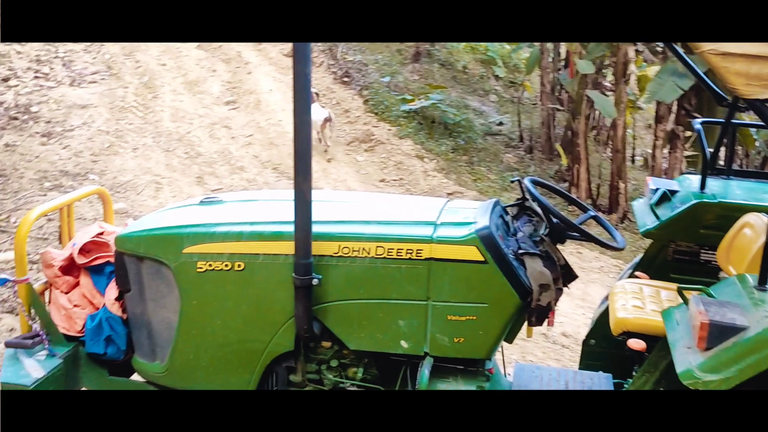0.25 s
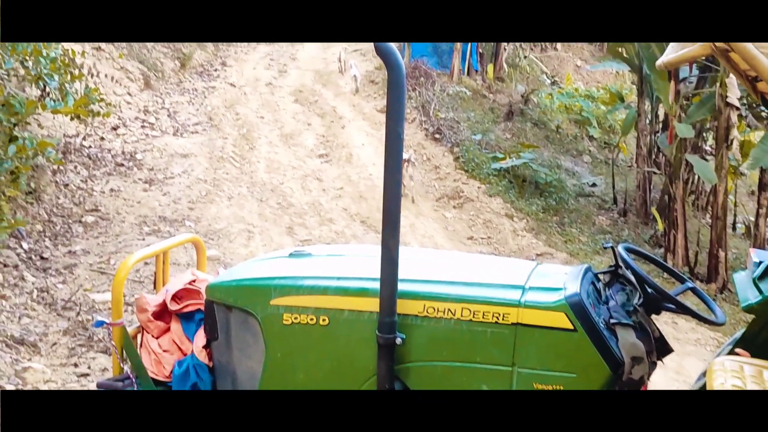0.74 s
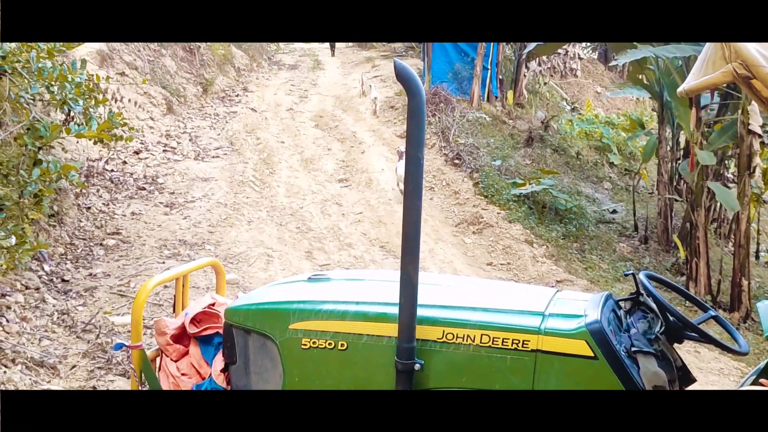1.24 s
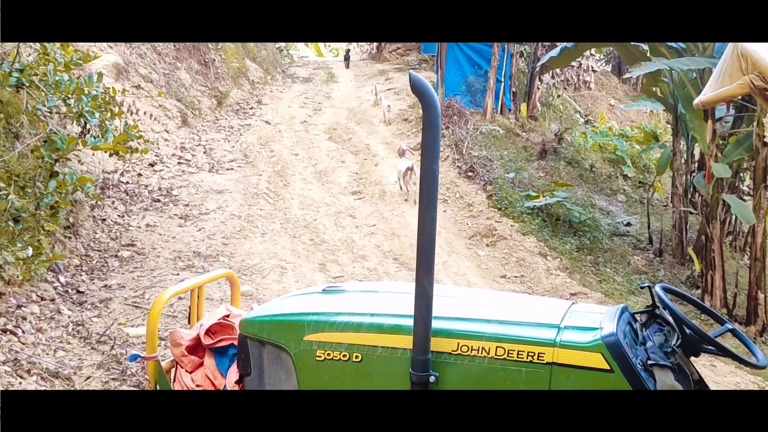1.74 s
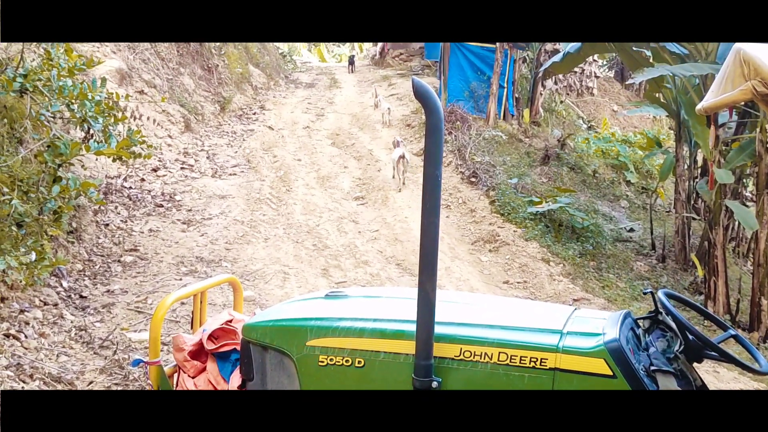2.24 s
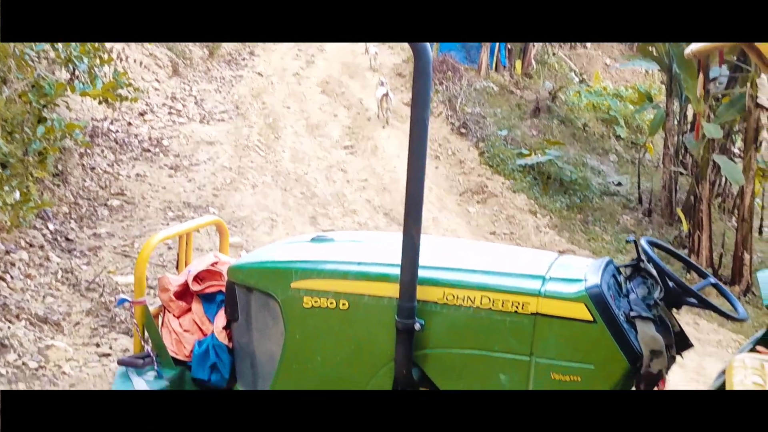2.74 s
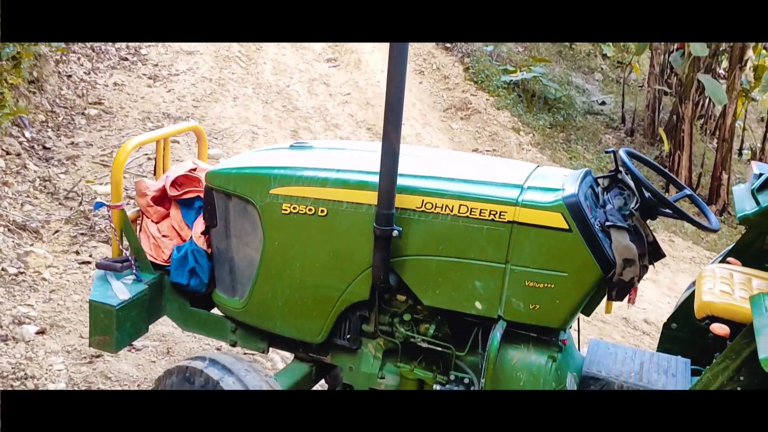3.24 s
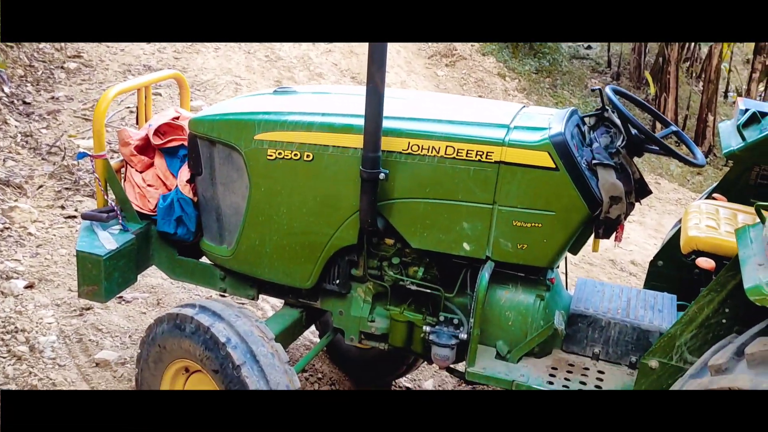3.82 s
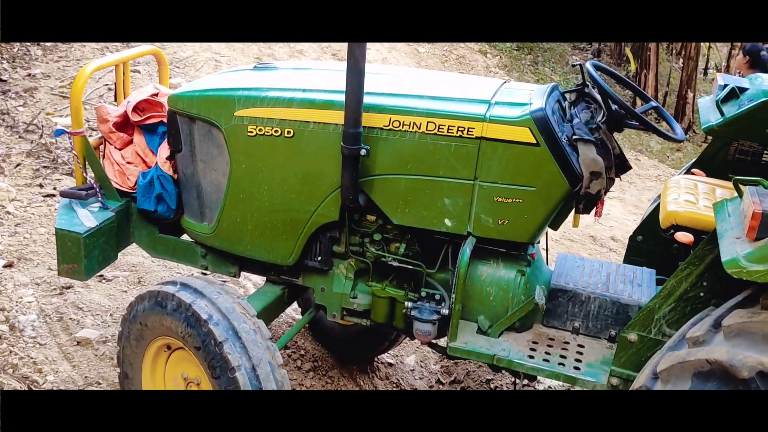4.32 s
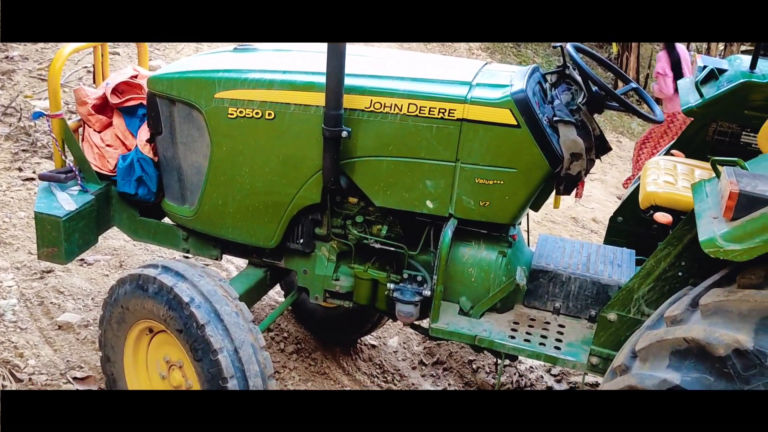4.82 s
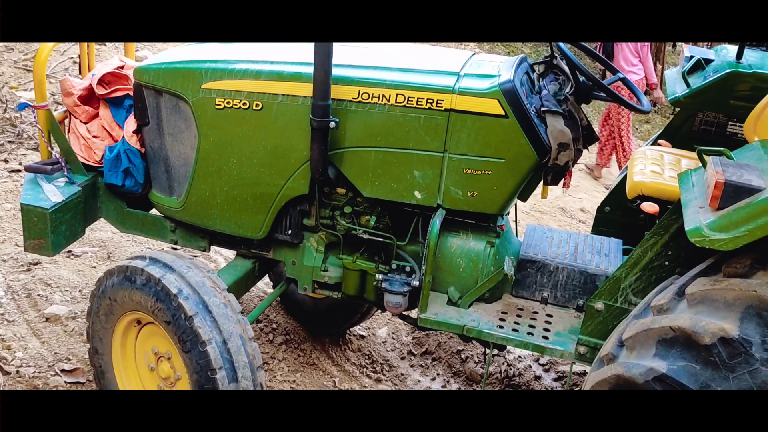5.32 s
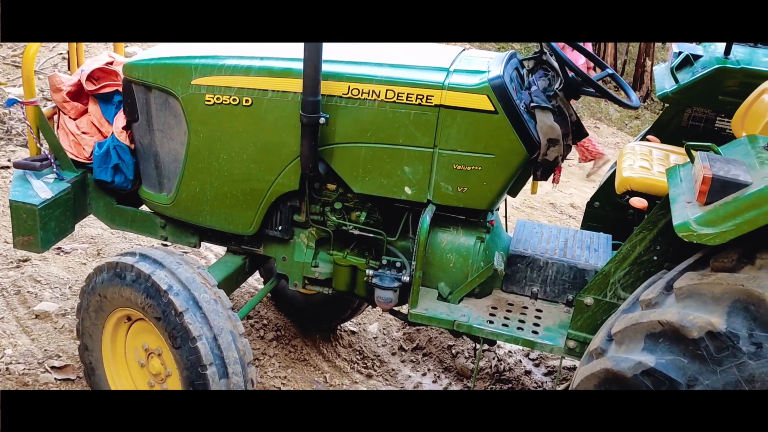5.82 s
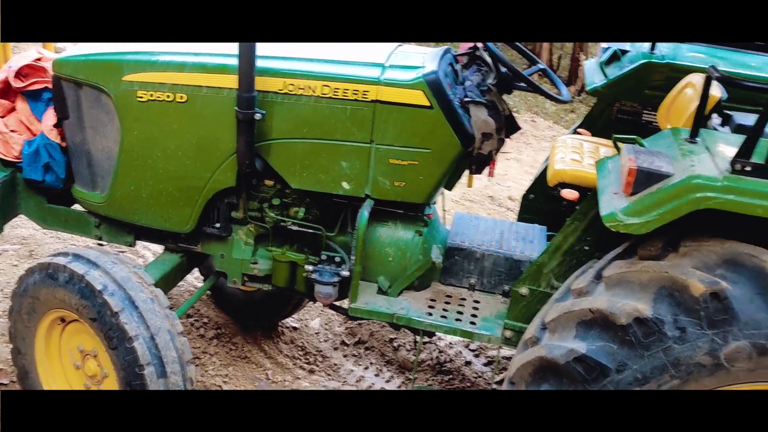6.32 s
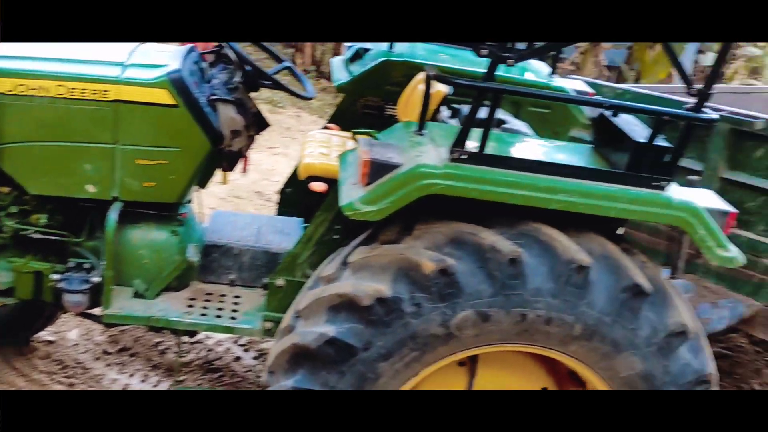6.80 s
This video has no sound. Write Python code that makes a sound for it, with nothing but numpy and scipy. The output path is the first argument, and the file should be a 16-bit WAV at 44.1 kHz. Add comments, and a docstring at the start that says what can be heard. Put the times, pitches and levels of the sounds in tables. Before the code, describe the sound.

On an open dirt track, steel blades jab into gravel with short crunches and bright pebble clicks. Around one second clods knock and boom on a loose metal sheet, which throbs and chatters. Two strong gritty shovel strokes follow, then quieter scrapes, dull thumps and soft close bumps on the left. Clicks return late, ending with two metallic digs. Stereo microphone, digging off to the right, low murmur beneath.

```python
"""Steel blades bite and scrape through loose gravel, pebbles click, and clods boom on a steel sheet.
Earth thumps down, bumps sound close to the left port, soil trickles over a low outdoor murmur.
Shaped impact noise makes gravel, soil, sand and grit; decaying sine modes make steel, stones and knocks.
Filtered noise makes the murmur and a thin echo; two coloured microphone ports pick it all up."""
import sys
import numpy as np
from scipy import signal
from scipy.fft import rfft, irfft
from scipy.io import wavfile
from scipy.ndimage import map_coordinates

SR = 44100
rng = np.random.default_rng(int(sys.argv[2]) if len(sys.argv) > 2 else 0)


def materialize(psi):
    """Save the field psi as 16-bit PCM at rate SR to the path in sys.argv[1].

    A 1-D psi becomes a single channel; in a 2-D psi each row is a channel.
    """
    bounded = np.clip(np.atleast_2d(psi).T, -1, 1)
    quanta = np.round(bounded * 32767).astype(np.int16)
    wavfile.write(sys.argv[1], SR, quanta)


N = 311346
T = np.arange(N) / SR
AGE = T[:SR]  # time since event onset, s

# blade strokes: t/s, push length/s, gravel level/dB, soil level/dB, sand level/dB, blade level/dB
BLADE_STROKES = [(0.003, 0.023, -47, -54, -71, -54), (0.165, 0.008, -51, -72, -42, -61),
                 (0.536, 0.041, -45, -46.5, -42, -60), (1.006, 0.041, -52, -47, -58, -61),
                 (1.043, 0.054, -49.5, -43, -60, -54), (1.09, 0.026, -47, -33.5, -65, -46),
                 (1.59, 0.033, -32.5, -33.5, -29.5, -45.5), (1.716, 0.011, -61, -48, -47, -78),
                 (2.177, 0.022, -46.5, -54, -49.5, -52), (2.247, .072, -33, -35.5, -26, -54),
                 (2.35, 0.0068, -54, -45.5, -44, -62), (2.682, 0.069, -47.5, -49, -45.5, -54),
                 (2.792, 0.028, -55, -66, -47, -64), (3.267, 0.069, -57.5, -59.5, -59, -63),
                 (3.381, 0.018, -57, -52.5, -55.5, -74), (3.674, 0.088, -76, -58, -67, -69),
                 (3.85, 0.065, -62, -56, -59, -70), (4.107, 0.0044, -57, -63, -80, -61),
                 (4.219, 0.073, -80, -62.5, -83, -81), (4.623, 0.015, -53, -72, -73, -64),
                 (5.06, 0.011, -53, -56, -66, -71), (5.455, 0.0054, -49, -52, -71, -67),
                 (5.593, 0.1, -54, -62, -51, -75), (6.851, 0.018, -39, -42.5, -29.5, -44.5),
                 (6.972, 0.03, -41, -54, -42, -51)]
# bare blade strikes a stone: t/s, level/dB
BLADE_CLANGS = [(1.603, -47.5), (2.283, -50), (6.859, -42.5), (6.986, -45.5)]
# gravel spectrum: f/Hz, density/dB per Hz
GRAVEL_SPECTRUM = [(200, -29), (900, -5), (1500, -5.5), (2200, -0.5), (3000, -2), (4200, 0), (6500, -1),
                   (8500, -3), (11000, -3.5), (15500, -12.5)]
# soil rustle spectrum: f/SOIL_HZ, density/dB per Hz
SOIL_SPECTRUM = [(.15, -12), (.4, -18.5), (.65, -1.5), (1, 2), (1.6, -1.5), (2.5, -3.5), (4, -8.5),
                 (7, -16), (13, -10.5), (45, -68)]
# sand hiss spectrum: f/Hz, density/dB per Hz
SAND_SPECTRUM = [(1000, -32), (4000, -0.5), (8000, 3.5), (10500, 3.5), (12500, -3), (14000, 3),
                 (15500, -15)]
SOIL_HZ = 291
RISE_SHARE, SETTLE_T60_S = 0.45, 0.21  # part of a push spent building up; decay after it
JERK_DB, JERK_HZ = 1.8, 110  # unevenness of the advance
COARSE_SHARE = 0.5  # coarse stones' share of gravel energy


def strokes():
    """The blade shoves stones in jerks: gravel crunches, stones chink, soil rustles, sand hisses, steel rings."""
    out, shove = np.zeros((2, N)), np.zeros((1, N))
    soil_points = [(k * SOIL_HZ, db) for k, db in SOIL_SPECTRUM]
    for t_s, length_s, gravel_db, soil_db, sand_db, blade_db in BLADE_STROKES:
        rise = np.minimum(AGE / (RISE_SHARE * length_s), 1)
        push = rise * fade(SETTLE_T60_S, length_s) * amp(JERK_DB * walk(JERK_HZ, SR))
        crunch = grains(rate_hz=5500, spread_db=3.0, apart=0.54)
        soil = unit(colour(grains(rate_hz=3000, spread_db=2.5, apart=1.0), soil_points))
        sand = unit(colour(grains(rate_hz=12000, spread_db=4.0, apart=2.6), SAND_SPECTRUM))
        fine = np.sqrt(1 - COARSE_SHARE) * unit(colour(crunch, GRAVEL_SPECTRUM))
        add(out, t_s, push * (amp(gravel_db) * fine + amp(soil_db) * soil + amp(sand_db) * sand))
        add(shove, t_s, push * amp(gravel_db))
        blade = steel()
        add(out, t_s, amp(blade_db) * convolve(push * crunch, blade / np.linalg.norm(blade)))
    for t_s, db in BLADE_CLANGS:
        add(out, t_s, amp(db) * steel())
    coarse = pebbles(count=3600, spread_db=2.5, cycles=23)
    return out + np.sqrt(COARSE_SHARE) * shove * coarse


# shovel blade modes: f/Hz, level/dB, t60/s
BLADE_MODES = [(606, 0, .15), (733, -1, 0.17), (872, 2, .35), (1174, 5, 0.38), (1631, -1.5, .45),
               (1701, -3, .3), (2116, -9, 0.35), (2258, -9, 0.25), (2320, -4, .3), (2506, 0, 0.42),
               (2790, 2, 0.22), (2950, 4, .13), (3946, -2, .22), (4107, -2, 0.22), (4656, 0, .22),
               (7635, 5, 0.16), (8129, 4, .2), (8320, 7, .19)]
BLADE_HZ = 2480  # modes lose 7 dB per octave away from here


def steel():
    """Free ring of a blade; stones excite its middle modes most."""
    modes = [(hz, db - 7 * abs(np.log2(hz / BLADE_HZ)), t60_s) for hz, db, t60_s in BLADE_MODES]
    return ring(modes, detune=0.00017)


def pebbles(count, spread_db, cycles):
    """Coarse gravel: each stone pings a few cycles at its own pitch and strength, unequal at the ports."""
    when, pitch, size, side = rng.random((4, count, 1))
    k, hz = np.arange(256), 1900 * 5 ** pitch
    turns = hz * k / SR
    strength = amp(-spread_db * np.log(np.maximum(size, 0.03))) * hz ** 0.4
    pings = strength * np.sin(2 * np.pi * turns) * amp(-60 * turns / cycles)
    places = ((when * N).astype(int) + k).ravel()
    ports = [np.bincount(places, (pings * (0.5 + near)).ravel(), N)[:N] for near in (side, 1 - side)]
    return unit(np.array(ports))


# stone clicks: t/s, level/dB, rattle/dB re click, tone centre f/Hz
STONE_CLICKS = [(0.169, -28, -6, 4760), (0.172, -32.5, -16, 2580), (0.323, -34.5, -28, 6300),
                (0.3754, -22, -17.5, 6300), (0.4226, -36, -15, 7550), (0.53, -44, -2, 4500),
                (0.5386, -31, -12, 4530), (0.5452, -27.5, -19, 2280), (0.582, -38.5, -20, 2270),
                (0.616, -38.5, -6, 6960), (0.6225, -32.5, -15, 4900), (0.6759, -28, -38, 5500),
                (1.0487, -33.5, -7.5, 2130), (1.055, -35, -7, 2120), (1.074, -33, -24, 2120),
                (1.103, -35.5, 2.5, 3460), (1.226, -38.5, -5.5, 4150), (1.5976, -25.5, -5, 4000),
                (2.185, -45, -4, 4940), (2.259, -32, -3, 3900), (2.278, -32.5, -7.5, 1090),
                (2.2799, -25, -10, 4530), (2.301, -30.5, -3, 3980), (2.326, -28, -7, 6200),
                (2.372, -38, -12, 3740), (4.6266, -45.5, 2.5, 4650), (5.415, -53, -1.5, 6960),
                (5.461, -35, -11, 4300), (5.561, -38, -12, 4200), (5.595, -35, -11, 2230),
                (5.6, -34.5, -15, 2150), (5.6066, -37, -17, 2230), (5.646, -40, -27, 2600),
                (5.6933, -35, -20, 5900), (5.6965, -36, -27, 5100), (5.741, -41, -16, 2400),
                (5.7243, -37, -14, 4670), (5.774, -36.5, -7, 6400), (5.8765, -43.5, -31, 3530),
                (5.955, -43.5, -13, 10500), (6.04, -51, 4.5, 8000), (6.149, -44.5, -13, 8700),
                (6.421, -45, -15, 1710), (6.859, -33, 1, 3030), (6.997, -36, -7, 3060),
                (7.005, -34, -19, 3060)]
# pebble modes: f/click centre, level/dB, t60/s
PEBBLE_MODES = [(.56, -10, 0.016), (1, -12.5, 0.044), (1.17, -17, 0.032)]
CLICK_T60_S, RATTLE_T60_S = 0.012, 0.22
SNAP_DB = 13  # single-sample first contact


def stones():
    """A pebble cracks against another, rings briefly, then rattles its neighbours."""
    out = np.zeros((2, N))
    for t_s, db, rattle_db, hz in STONE_CLICKS + strays():
        tone = [(hz / 12, -28), (hz / 1.84, -7), (hz, 0), (hz * 1.72, -5), (hz * 3, -17), (hz * 6, -32)]
        crackle = grains(rate_hz=11000, spread_db=-8.5, apart=1.0)
        decay = amp(-4.5) * fade(CLICK_T60_S) + amp(rattle_db) * fade(RATTLE_T60_S)
        contact = amp(SNAP_DB) * (AGE == 0) + crackle * decay
        add(out, t_s, amp(db) * colour(contact, tone) / np.std(colour(crackle, tone)))
        modes = [(k * hz, level_db, t60_s) for k, level_db, t60_s in PEBBLE_MODES]
        add(out, t_s, amp(db) * ring(modes, detune=0.013))
    return out


STRAY_RATE_HZ, STRAY_DB_RE_FLOW, STRAY_RATTLE_DB, STRAY_HZ = 2, 10, -12, 5000


def strays():
    """Faint pebbles roll at random moments, louder while more soil runs; rows as in STONE_CLICKS."""
    chance = rng.random((int(STRAY_RATE_HZ * N / SR), 2))
    return [(t_s, flow_db(t_s) + STRAY_DB_RE_FLOW, STRAY_RATTLE_DB, STRAY_HZ * 2 ** (octave - 0.5))
            for t_s, octave in chance * [N / SR, 1]]


# clods on the sheet: t/s, thud level/dB, grit level/dB, boom level/dB, knock level/dB, knock f/Hz
CLOD_HITS = [(0.921, -41, -46, -58, -44, 576), (1.047, -31, -31, -44, -28, 459),
             (1.063, -34, -46, -50, -29, 495), (1.099, -37, -35.5, -43, -34, 290),
             (1.121, -40, -41, -50, -30.5, 300), (1.172, -44, -65, -57, -31.5, 288),
             (1.194, -55, -55, -65, -41, 272), (1.225, -38, -40, -38, -29, 246.5),
             (1.252, -56, -61, -48, -31.5, 281), (1.3168, -26, -33.5, -19.5, -27.5, 260),
             (1.429, -29.5, -41, -28.5, -36, 169), (1.442, -34.5, -52, -35, -39, 420),
             (1.495, -38.5, -46.5, -49, -62, 407), (6.217, -55, -65, -76, -52, 660)]
# steel sheet modes: f/Hz, level/dB, t60/s
SHEET_MODES = [(140, -24, 0.36), (247, -17.5, 0.49), (300.3, -10.5, 0.38), (318.4, -9.5, 0.29),
               (389.3, 4.5, 0.26), (435, -15, 0.37), (498, -9.5, 0.35), (620, -30, 0.22), (722, -27, 1),
               (740, -18, 0.33), (776, -21, 0.5), (960, -17, 0.32), (970, -32, 0.82)]
# thud spectrum: f/Hz, density/dB per Hz
THUD_SPECTRUM = [(50, -49), (120, -7.5), (220, -6.5), (330, -4), (490, -0.5), (760, -2), (1200, -16.5),
                 (2500, -32), (8000, -68)]
# grit spectrum: f/Hz, density/dB per Hz
GRIT_SPECTRUM = [(300, -8.5), (1000, 6.5), (1500, 0.5), (2200, 7), (3200, -4), (6000, -9.5), (10000, -62),
                 (15000, -39)]
CLOD_T60_S = 0.23
ROCK_HZ, ROCK_DEPTH, ROCK_PEAK_S = 27, 0.55, 0.013  # loose sheet rocks: rate, depth 0-1, first swell


def clods():
    """A clod knocks and bursts into thud and grit; the sheet swells into a boom that throbs as it rocks."""
    out = np.zeros((2, N))
    rocking = 1 + ROCK_DEPTH * np.cos(2 * np.pi * ROCK_HZ * (AGE - ROCK_PEAK_S))
    throb = rocking * (1 - np.exp(-(AGE / 0.004) ** 2))
    burst = np.minimum(AGE / 0.0017, 1) * fade(CLOD_T60_S, 0.0021)
    for t_s, thud_db, grit_db, boom_db, knock_db, knock_hz in CLOD_HITS:
        thud = unit(colour(grains(rate_hz=4000, spread_db=0.5, apart=0.34), THUD_SPECTRUM))
        grit = unit(colour(grains(rate_hz=1100, spread_db=2.0, apart=0.99), GRIT_SPECTRUM))
        boom = throb * ring(SHEET_MODES, detune=0.0023)
        add(out, t_s, amp(boom_db) * boom + amp(knock_db) * knock(knock_hz, t60_s=0.14))
        add(out, t_s, burst * (amp(thud_db) * thud + amp(grit_db) * grit))
    return out


# dull knock modes: f/knock pitch, level/dB, share of knock t60
KNOCK_MODES = [(.68, 6, 0.14), (1, 0, 0.87), (1.22, 5.5, 0.35), (1.501, -9, 0.5)]


def knock(hz, t60_s):
    """Soft contact: builds over one cycle; each mode dies in its share of t60_s."""
    modes = [(k * hz, db, share * t60_s) for k, db, share in KNOCK_MODES]
    return ring(modes, detune=0.0031) * np.minimum(AGE * hz, 1)


# sheet bounces: t/s, level/dB, f/free ring f
SHEET_REBOUNDS = [(1.475, -27.5, 0.99), (1.498, -32, 0.98), (1.512, -28, 1.04), (1.53, -35, 1.04),
                  (1.548, -40, 1.02), (1.567, -36, 1.07)]
REBOUND_RISE_S = 0.0058


def rebounds():
    """The loose sheet chatters on its support: short swells of its ring, bent a little in pitch."""
    out = np.zeros((2, N))
    for t_s, db, bend in SHEET_REBOUNDS:
        modes = [(bend * hz, level_db, t60_s) for hz, level_db, t60_s in SHEET_MODES]
        add(out, t_s, amp(db) * swell(REBOUND_RISE_S) * ring(modes, detune=0.002))
    return out


# loads of earth on the heap: t/s, time to peak/s, level/dB, f/Hz
EARTH_THUMPS = [(2.272, 0.0098, -42, 747), (2.312, 0.0081, -27.5, 292), (2.338, 0.0086, -38, 237),
                (2.356, 0.0083, -39, 314), (3.58, 0.017, -47, 150), (3.692, 0.018, -47.5, 310),
                (3.792, 0.015, -51, 307), (4.14, .016, -52.5, 157), (4.241, 0.022, -49, 94.5),
                (4.29, 0.015, -50, 257), (4.322, 0.021, -51.5, 321), (4.613, 0.026, -48, 105),
                (5.603, 0.0098, -48, 125), (5.634, 0.011, -42.5, 175), (6.216, 0.0043, -46, 633),
                (6.394, 0.0058, -49.5, 361), (6.858, 0.019, -42.5, 615), (6.864, 0.01, -46.5, 175),
                (6.996, 0.0088, -45, 127)]
# thump modes: f/thump pitch, level/dB, t60/s
EARTH_MODES = [(.78, -3, 0.31), (1, 3.5, 0.3), (1.24, -2, .15)]


def thumps():
    """Soft earth lands with a dull note that swells and is damped at once."""
    out = np.zeros((2, N))
    for t_s, rise_s, db, hz in EARTH_THUMPS:
        modes = [(k * hz, level_db, t60_s) for k, level_db, t60_s in EARTH_MODES]
        add(out, t_s, amp(db) * swell(rise_s) * ring(modes, detune=0.0023))
    return out


# soft bumps close by: t/s, level/dB, f/Hz, contact tick level/dB
NEAR_BUMPS = [(3.238, -38, 253, -51), (3.467, -34.5, 234, -46.5), (4.86, -42, 388, -55),
              (4.871, -40.5, 357, -44), (6.568, -38, 200, -40.5), (6.709, -40.5, 124, -52),
              (7.001, -30.5, 324, -39)]
BUMP_CYCLES, BUMP_PAN_DB = 5.4, 22.5  # knock t60 in cycles; left minus right


def bumps():
    """Dull knocks with a contact tick, so near that the left port hears them much louder."""
    out = np.zeros((2, N))
    tick_modes = [(825, 0.5, 0.0024), (1420, -5.0, 0.0045), (2040, -28, 0.0023)]  # f/Hz, level/dB, t60/s
    for t_s, db, hz, tick_db in NEAR_BUMPS:
        tick = ring(tick_modes, detune=0.038)
        add(out, t_s, amp(db) * knock(hz, BUMP_CYCLES / hz) + amp(tick_db) * tick)
    out = signal.sosfilt(signal.butter(1, 90, "high", fs=SR, output="sos"), out)
    return out * amp([[BUMP_PAN_DB / 2], [-BUMP_PAN_DB / 2]])


# soil flow down the heap: t/s, level/dB
SOIL_FLOW = [(0.0, -62.5), (0.15, -61), (1.32, -55.5), (2.18, -60.5), (2.33, -65), (2.78, -63.5),
             (5.42, -69.5), (5.62, -62), (6.25, -69.5), (6.8, -65)]


def flow_db(t_s):
    """Strength of the running soil, interpolated in dB."""
    return np.interp(t_s, *np.transpose(SOIL_FLOW))


# murmur spectrum: f/Hz, density/dB per Hz
AIR_SPECTRUM = [(15, -48), (25, -46), (53, -22), (96, 0.5), (133, -2.5), (183, -2), (221, -2), (313, -3),
                (457, -6), (1170, -11), (2230, -10.5), (3090, -21), (7300, -37), (8130, -42),
                (15500, -19.5)]
# ground rumble spectrum: f/Hz, density/dB per Hz
RUMBLE_SPECTRUM = [(20, -34), (45, -8.5), (80, 1.5), (120, -7), (250, -52), (1000, -87)]
MURMUR_DB, RUMBLE_DB = -55.5, -68.0
TRICKLE_DB_RE_FLOW, TRICKLE_COARSE_DB = 1.5, -7  # coarse stones re fine crackle


def background():
    """A wavering outdoor murmur, a faint rumble, and running soil as dense small impacts."""
    noise = rng.standard_normal((3, N))
    bass = signal.sosfilt(signal.butter(1, 700, fs=SR, output="sos"), noise[0])
    # long waves reach both ports alike, short ones do not
    waves = bass * amp(1.6 * walk(11, N)) + 0.5 * noise[1:] * amp(1.0 * walk(6, N))
    air = amp(MURMUR_DB) * unit(colour(waves, AIR_SPECTRUM))
    rumble = amp(RUMBLE_DB) * unit(colour(rng.standard_normal((2, N)), RUMBLE_SPECTRUM))
    fine = unit(colour(grains(rate_hz=2500, spread_db=-2.5, apart=1.8, size=N), GRAVEL_SPECTRUM))
    coarse = amp(TRICKLE_COARSE_DB) * pebbles(count=1200, spread_db=-2.5, cycles=22)
    trickle = (fine + coarse) * amp(2 * walk(40, N))
    return rumble + air + trickle * amp(TRICKLE_DB_RE_FLOW + flow_db(T))


def bank_echo(x, db, t60_s):
    """The earth bank and the trees scatter back a thin tail: decaying coloured noise as the response."""
    points = [(100, -17.0), (500, 0.0), (2000, 3.0), (8000, -4.5), (13000, -16)]  # f/Hz, gain/dB
    tail = colour(rng.standard_normal((2, SR)), points)
    tail = tail * fade(t60_s) * np.minimum(AGE / 0.0013, 1)
    return amp(db) * convolve(x, tail / np.linalg.norm(tail[0]))


def ring(modes, detune):
    """Sum of decaying sine modes, each shifted a little at random by the load."""
    out = 0
    for hz, db, t60_s in modes:
        shifted_hz = hz * (1 + detune * rng.standard_normal())
        out = out + amp(db) * amp(-60 * AGE / t60_s) * np.sin(2 * np.pi * shifted_hz * AGE)
    return out


def grains(rate_hz, spread_db, apart, size=SR):
    """Tiny impacts of uneven strength: one train common to both ports, plus one per port scaled by apart."""
    hits = (rng.random((3, size)) < rate_hz / SR) * rng.choice([-1, 1], (3, size))
    hits = hits * amp(spread_db * np.minimum(rng.exponential(size=(3, size)), 4))
    return unit(hits[0] + apart * hits[1:])


def walk(rate_hz, size):
    """Random wander: straight lines between rate_hz Gaussian values per second."""
    steps = rng.standard_normal(size // 16)
    return map_coordinates(steps, [np.arange(size) * rate_hz / SR], order=1, mode="mirror")


def fade(t60_s, wait_s=0):
    """Steady for wait_s, then an exponential decay."""
    return np.exp(-np.log(1000) * np.maximum(AGE - wait_s, 0) / t60_s)


def swell(rise_s):
    """Rounded envelope that peaks at rise_s and dies at once."""
    return (AGE / rise_s * np.exp(1 - AGE / rise_s)) ** 2


def colour(x, points, size=2048):
    """Causal minimum-phase filter through (f/Hz, gain/dB) points, from the cepstrum of the log gain."""
    hz, db = np.transpose(points)
    grid_hz = np.maximum(np.fft.rfftfreq(size, 1 / SR), 1)
    cepstrum = irfft(np.log(amp(np.interp(np.log(grid_hz), np.log(hz), db))))
    cepstrum[1:size // 2] *= 2
    cepstrum[size // 2 + 1:] = 0
    return convolve(x, irfft(np.exp(rfft(cepstrum))))


def convolve(x, response):
    """Pass the channels through a response, keeping the length."""
    return signal.fftconvolve(x, np.atleast_2d(response), axes=-1)[:, :x.shape[-1]]


def add(out, t_s, sound):
    """Mix a sound in at t_s."""
    i = max(int(t_s * SR), 0)
    out[:, i:i + sound.shape[-1]] += sound[..., :N - i]


def unit(x):
    """Scale to an rms of 1."""
    return x / np.sqrt(np.mean(x ** 2))


def amp(db):
    """Decibels to gain."""
    return 10 ** (np.asarray(db) / 20)


# left port delay as the two ports turn: t/s, lag/ms
LEFT_LAG = [(0, .43), (.6, .48), (1.3, .47), (2.3, .45), (2.75, .495), (4.5, .47), (5.7, .41), (7.06, .41)]


def scene():
    """Digging off to the right: work, echo and background reach the left port later; bumps do not lag."""
    work = strokes() + stones() + clods() + rebounds() + thumps()
    left, right = work + bank_echo(work, db=-13.5, t60_s=0.6) + background()
    lag_s = np.interp(T, *np.transpose(LEFT_LAG)) / 1000
    late_left = map_coordinates(left, [(T - lag_s) * SR], order=5)
    return np.array([late_left, right]) + bumps()


# left port response: f/Hz, gain/dB
LEFT_RESPONSE = [(200, -0.5), (400, 0), (750, -1.5), (1300, 2), (2100, 2), (3200, -3), (6000, -6),
                 (8200, -11.5), (9800, -27), (12000, -2), (14000, -7), (15500, -3)]
# right port response: f/Hz, gain/dB
RIGHT_RESPONSE = [(200, -1), (400, 1), (750, 2), (1300, 3), (2100, -4), (3200, -2), (6000, -1), (7850, 1.5),
                  (8250, 5), (8700, 0), (9800, -4.5), (11300, -9), (13900, 0.5), (15500, -41)]
TOP_HZ = 15700


def record(dry):
    """Colour each port, then cut steeply above TOP_HZ."""
    ports = np.vstack([colour(dry[:1], LEFT_RESPONSE), colour(dry[1:], RIGHT_RESPONSE)])
    return signal.sosfilt(signal.ellip(10, 0.2, 80, TOP_HZ, fs=SR, output="sos"), ports)


dry = scene()
out = record(dry)
materialize(out)
```